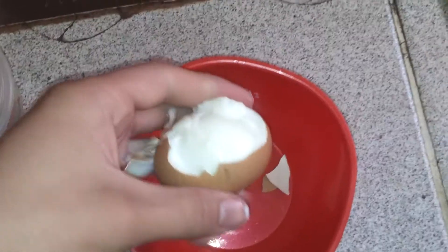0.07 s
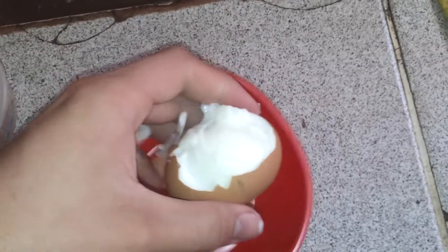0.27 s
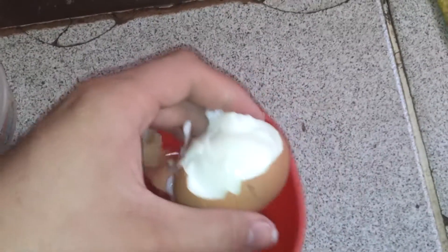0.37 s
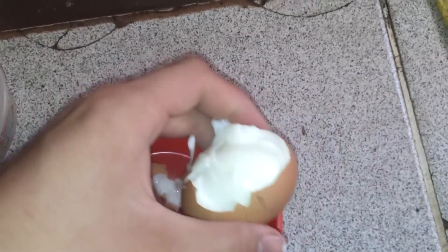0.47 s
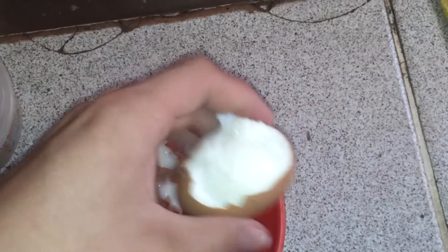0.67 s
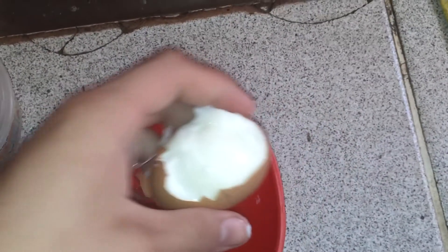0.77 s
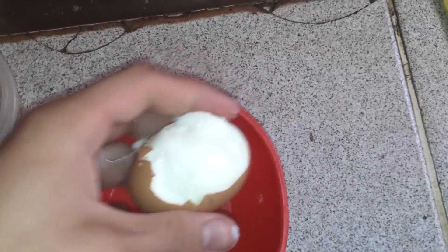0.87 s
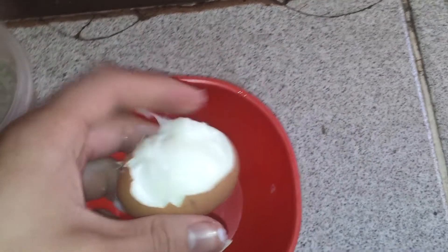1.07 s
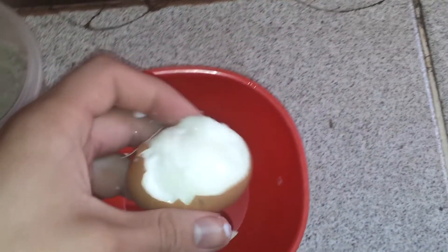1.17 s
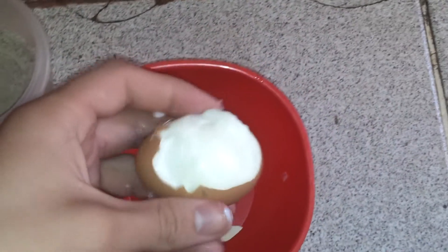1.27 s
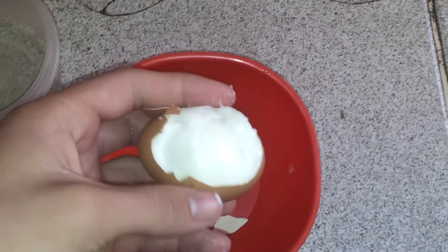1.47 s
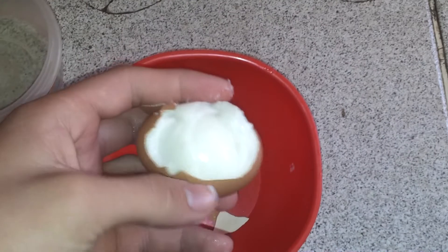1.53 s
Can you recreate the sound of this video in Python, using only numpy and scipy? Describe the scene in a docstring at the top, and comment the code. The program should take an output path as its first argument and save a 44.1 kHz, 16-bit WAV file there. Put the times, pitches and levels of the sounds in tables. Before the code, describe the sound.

A plastic bowl scrapes briefly over a gritty stone floor and knocks twice. Bits of eggshell drop in with sharp clicks, then the shell crackles faintly under fingers. Heard close in a small, reverberant room with a low hum.

```python
"""A plastic bowl scrapes over a gritty stone floor and knocks twice, nudged by a hand that holds a
half-peeled boiled egg. Friction on the grit makes the scrape; each impact sets the bowl's modes ringing.
Bits of eggshell then drop in with sharp clicks, and the shell crackles faintly as it fractures under
the fingers. All is heard from close by, in a small, reverberant, hard-walled room with a low hum."""
import sys
import numpy as np
from scipy import signal
from scipy.fft import rfft, irfft
from scipy.io import wavfile
from scipy.ndimage import uniform_filter1d, minimum_filter1d

SR = 44100
rng = np.random.default_rng(int(sys.argv[2]) if len(sys.argv) > 2 else 0)


def transcribe(u):
    """Save the signal u as a 16-bit wav file named by the first command-line argument.

    u: samples, shape (n,) or (channels, n), limited to [-1, 1]; the rate is SR.
    q: integer samples, one column per channel.
    """
    v = np.clip(np.atleast_2d(u).T, -1, 1)
    q = np.round(v * 32767).astype(np.int16)
    wavfile.write(sys.argv[1], SR, q)


N = 70560

# Spectra of still air and low rumble. Each row: frequency in Hz, relative level in dB.
AIR_SPECTRUM = [(25, -55), (110, -41), (170, -16), (240, -11), (450, -15.5), (950, -19.5), (1900, -25.5),
                (3900, -27), (5600, -30), (7300, -28.5), (15000, -30.5)]
RUMBLE_SPECTRUM = [(25, -13), (55, -7), (90, 5), (170, 0), (260, -8), (600, -47)]
# Tones of the hum. Each row: frequency in Hz, level in dB before the envelope.
HUM_TONES = [(110, -64), (116, -71.5), (238, -76.5), (277, -72)]
# Envelopes of the hum with its rumble, and of the whine. Each row: time in seconds, gain in dB.
HUM_ENVELOPE = [(0, 1), (0.06, -16), (0.4, -21), (0.52, 1.5), (0.749, 4), (0.95, 1.5), (1.2, 3),
                (1.475, 2.5), (1.505, -6)]
WHINE_ENVELOPE = [(1.05, -84), (1.2, -77.5), (1.39, -68.5), (1.6, -70)]
# Bands of the room's tail. Each row: frequency in Hz, 60 dB decay time in seconds, relative level in dB.
REVERB_BANDS = [(110, .3, -12), (300, 0.55, 2.5), (1090, 0.34, 4), (2500, 0.28, 1), (4960, 0.31, -7),
                (12300, 0.33, -5)]
# Balance of the near sounds. Each row: frequency in Hz, left minus right in dB.
BALANCE = [(200, 0), (1000, 0.5), (2500, 0.5), (3600, 3), (4800, 8.5), (6500, 8), (9000, 5.5), (14000, 1.5)]

# Crackles under the fingers. Each row: start in seconds, length in seconds, level in dB.
CRACKLE_BURSTS = [(0.634, 0.0053, -46), (0.675, 0.0054, -59), (0.897, 0.006, -53), (0.98, 0.01, -53),
                  (1.081, 0.0052, -53.5), (1.092, 0.023, -57.5), (1.207, 0.0091, -54),
                  (1.391, 0.0053, -56.5), (1.483, 0.025, -47), (1.512, .005, -42)]
# Impacts of shell flakes, plus one light tap on the bowl at 0.5088 s ringing near 2.4 kHz. Each row: start in
# seconds, level in dB, ring frequency in Hz, relative ring level in dB.
FLAKE_IMPACTS = [(0.4472, -5.5, 6820, -11), (0.4528, 1, 5700, -17), (0.4544, 6.5, 5400, -27),
                 (0.4564, 0.5, 4900, -32), (0.4622, -29, 5640, -25), (0.4990, 1, 6100, -40),
                 (0.5011, -4.5, 6500, -39), (0.5088, -18, 2370, 2), (0.5098, -2.5, 5600, -40)]
# Spectra of a crackle and a click. Each row: frequency in Hz, relative level in dB.
CRACKLE_SPECTRUM = [(300, -3), (1500, -13.5), (3000, -6.5), (4200, -3.5), (6000, -1.5), (7500, 3.5),
                    (9500, -2), (11500, -8), (15000, -15)]
CLICK_SPECTRUM = [(200, -45), (600, -15), (1700, -18.5), (2400, -18), (2850, -21.5), (3500, -6),
                  (4300, -2.5), (6000, 0.5), (8000, -2.5), (10000, -12.5), (15000, -26.5)]

# Envelopes of the bowl's judder and slide. Each row: time in seconds, gain in dB.
JUDDER_ENVELOPE = [(0.021, -72), (0.024, -41), (0.038, -55.5), (0.054, -48), (0.085, -56), (0.12, -83)]
SLIDE_ENVELOPE = [(0.021, -61), (0.025, -36), (0.057, -37), (0.085, -39.5), (0.105, -33.5), (0.138, -37),
                  (0.16, -34.5), (0.2, -52), (0.262, -45.5), (0.287, -29.5), (0.335, -36), (0.365, -29.5),
                  (0.403, -38), (0.42, -41), (0.445, -60)]
# Spectra of the scrape and of a knock's thud and edge. Each row: frequency in Hz, relative level in dB.
SCRAPE_SPECTRUM = [(100, -36.5), (350, -9), (600, -7.5), (820, -3), (1050, -9.5), (1300, -6), (1800, -18.5),
                   (2450, -6.5), (3000, -11), (4000, 0.5), (4700, 4.5), (5700, -4), (7500, 0),
                   (10000, -9.5), (15000, -29)]
THUD_SPECTRUM = [(60, -41.5), (180, -20.5), (330, -4), (600, -5.5), (900, 2), (1300, -0.5), (1900, -7.5),
                 (2900, -14), (6000, -30), (16000, -54)]
EDGE_SPECTRUM = [(500, -40), (2000, -2.5), (2900, -9.5), (3700, -1.5), (4300, -2.5), (4900, 5),
                 (5800, -11.5), (6900, -4), (8400, -6.5), (10500, -20), (15000, -42)]
# Normal modes of the bowl. Each row: frequency in Hz, relative level in dB when struck on the wall,
# the same when struck on the foot, 60 dB decay time in seconds.
BOWL_MODES = [(534, -26, -5, .25), (654, -22, -23, 0.13), (760, -14, -34, 0.13), (913, -15, -29, 0.25),
              (947.5, -10, 0, 0.27), (1059, -7.5, -9, 0.32), (1110, -11, -0.5, .22), (1238, 8.5, 4, 0.28),
              (1433, -22, 0.5, 0.23), (1610, 9, -7, 0.075), (1900, -14, -18, 0.16), (2330, 10, -1, .07),
              (2356, 6, 5, 0.072), (2450, 7.5, -17, 0.069)]
# Impacts of the bowl, clustered into knocks. Each row: start in seconds, level in dB, edge offset in dB,
# ring offset in dB, place struck (0 is the wall, 1 or more the foot).
BOWL_IMPACTS = [(0.0249, -30, 1, 4, 0.58), (0.1661, -2.5, -2.5, 0, 2.5), (0.1688, -6.5, 3, -5.5, 0.11),
                (0.1712, -4, 4, -27, 0), (0.1725, -6.5, -16, 8.5, 0.02), (0.2732, 3.5, -3.5, 0, 0.98),
                (0.2760, -28.5, 19.5, -8, 0.81), (0.282, -17, -11, -22, 0.79),
                (0.3123, -9.5, -7, -3.5, 0.43), (0.3255, -13.5, -10, -10, 0.73)]

TIME = np.arange(N) / SR


def undb(db):
    """Amplitude grows tenfold for every 20 dB."""
    return 10 ** (np.asarray(db) / 20)


def unit_energy(x):
    """Normalisation: the squared samples sum to one."""
    return x / np.sqrt(np.sum(x ** 2, axis=-1, keepdims=True))


def at_frequency(points, f):
    """Interpolation of (Hz, value) points on a logarithmic frequency axis."""
    hz, value = np.array(points).T
    return np.interp(np.log(f + 1), np.log(hz), value)


def envelope(points):
    """Amplitude envelope: straight lines in decibels between (seconds, dB) points."""
    return undb(np.interp(TIME, *np.array(points).T))


def convolve(x, response):
    """Convolution: each sample excites a copy of the impulse response."""
    return signal.fftconvolve(np.atleast_2d(x), np.atleast_2d(response))[:, :N]


def colour(x, spectrum, size=2048):
    """Minimum-phase filtering: a causal response of unit energy imposes the spectrum on x."""
    cepstrum = irfft(np.log(undb(at_frequency(spectrum, np.fft.rfftfreq(size, 1 / SR)))))
    cepstrum[1:size // 2] *= 2
    cepstrum[size // 2 + 1:] = 0
    return convolve(x, unit_energy(irfft(np.exp(rfft(cepstrum)))))


def highpass(x, hz, order):
    """High-pass filtering: the bass falls by 6 dB per octave for each order."""
    return signal.sosfilt(signal.butter(order, hz, "high", fs=SR, output="sos"), x)


def decay(t60):
    """Exponential damping: a fall of 60 dB in t60 seconds."""
    return np.exp(-np.log(1000) * TIME / t60)


def mode(hz, t60, phase=0):
    """Free vibration of one mode: a damped sinusoid."""
    return np.sin(2 * np.pi * hz * TIME + phase) * decay(t60)


def add(out, start, x):
    """Superposition: x joins the mix at start seconds."""
    i = int(start * SR)
    out[..., i:] += x[..., :N - i]


def wander(rate_hz):
    """Slow random modulation with a spread near one."""
    step = int(SR / rate_hz)
    return uniform_filter1d(np.repeat(rng.standard_normal(N // step + 1), step), step)[:N]


def diffuse_noise(corner_hz=1000):
    """A diffuse field: white noise whose two sides are partly coherent in the bass."""
    coherence = 0.52 / (1 + (np.fft.rfftfreq(N, 1 / SR) / corner_hz) ** 2)
    mid, side = rfft(rng.standard_normal((2, N)))
    spectrum = mid * np.sqrt(1 + coherence) + np.array([[1], [-1]]) * side * np.sqrt(1 - coherence)
    return irfft(spectrum, N) / np.sqrt(2)


def contact(rattle_db, t60):
    """Impact excitation: one impulse, then a decaying chatter of tiny ones."""
    return signal.unit_impulse(N) + undb(rattle_db) * unit_energy(diffuse_noise() * decay(t60))


def shot_noise(per_second=12000, spread_db=2.5):
    """Shot noise of unit rms: dense, independent impulses of uneven size."""
    occurs = rng.random(N) < per_second / SR
    size = undb(spread_db * np.minimum(rng.exponential(size=N), 4))
    sign = rng.choice([-1, 1], N)
    return unit_energy(occurs * sign * size) * np.sqrt(N)


def background(waver_db=2, drift=0.0057):
    """Modulated tones make a wavering hum; filtered noise makes rumble, a faint whine and still air."""
    hum = 0
    for hz, db in HUM_TONES:
        amplitude = np.sqrt(2) * undb(db + waver_db * wander(7.1))
        phase = 2 * np.pi * np.cumsum(hz * (1 + drift * wander(6.5))) / SR
        hum += amplitude * np.sin(phase)
    rumble = undb(-68.5) * colour(diffuse_noise(), RUMBLE_SPECTRUM)
    whine = convolve(diffuse_noise(), unit_energy(mode(hz=3935, t60=.025)))
    air = undb(-57) * colour(diffuse_noise(), AIR_SPECTRUM)
    return (hum + rumble) * envelope(HUM_ENVELOPE) + whine * envelope(WHINE_ENVELOPE) + air


def room(x, wet_db, early_onset_s=.002, tail_onset_s=.017):
    """Reverberation: direct sound, early reflections and a tail that lasts longest in the low middle."""
    f = np.fft.rfftfreq(N, 1 / SR)
    centres = [hz for hz, _, _ in REVERB_BANDS]
    noise, tail = rfft(diffuse_noise()), 0
    for weights, (_, t60, db) in zip(np.eye(len(centres)), REVERB_BANDS):
        share = at_frequency(list(zip(centres, weights)), f)  # neighbouring bands crossfade
        shape = unit_energy(decay(t60) * np.minimum(TIME / tail_onset_s, 1))
        tail += undb(db) * irfft(noise * share, N) * shape
    early = unit_energy(diffuse_noise() * decay(t60=.073) * np.minimum(TIME / early_onset_s, 1))
    echoes = highpass(undb(-4.5) * tail + undb(-4) * early, hz=278, order=4)
    return x + undb(wet_db) * signal.fftconvolve(x, echoes, axes=1)[:, :N]


def stereo_image(x, left_lag_s=.00007):
    """Level and time differences: the left side has more treble and arrives slightly later."""
    f = np.fft.rfftfreq(2 * N, 1 / SR)
    tilt = undb(np.array([[1], [-1]]) * at_frequency(BALANCE, f) / 2)
    lag = np.exp(-2j * np.pi * f * np.array([[left_lag_s], [0]]))
    return irfft(rfft(x, 2 * N) * tilt * lag)[:, :N]


def shell_crackles():
    """Brittle fracture: the shell gives way in short runs of tiny cracks as the grip shifts."""
    grip = 0
    for start, length, db in CRACKLE_BURSTS:
        progress = np.clip((TIME - start) / length, 0, 1)
        grip += undb(db) * np.sqrt(np.abs(np.sin(np.pi * progress)))
    return colour(shot_noise() * grip, CRACKLE_SPECTRUM)


def shell_clicks(gain_db=-5.5, ring_cycles=30):
    """Impact of light bodies: falling flakes of shell tick, chatter and ring for an instant; one light tap on
    the bowl rings lower."""
    out = np.zeros((2, N))
    for start, db, hz, ring_db in FLAKE_IMPACTS:
        tick = contact(rattle_db=-4, t60=.025)
        ring = undb(ring_db) * mode(hz, t60=ring_cycles / hz)
        add(out, start, undb(db + gain_db) * (tick + ring))
    return colour(out, CLICK_SPECTRUM)


def bowl_scrape():
    """Stick-slip friction: the bowl's foot judders into motion and catches on grit as it slides."""
    moving = (TIME > SLIDE_ENVELOPE[0][0]) & (TIME < SLIDE_ENVELOPE[-1][0])
    resonance = unit_energy(mode(hz=787, t60=.045))
    judder = convolve(shot_noise() * moving * envelope(JUDDER_ENVELOPE), resonance)
    slide = colour(shot_noise() * moving * envelope(SLIDE_ENVELOPE), SCRAPE_SPECTRUM)
    return judder + slide


def bowl_ring(gain_db=-31, phase_spread_rad=0.98):
    """Modal vibration: the place struck weights each mode, which reaches the two sides out of step."""
    out = np.zeros((2, N))
    modes = [mode(hz, t60, phase_spread_rad * rng.standard_normal((2, 1)))
             for hz, _, _, t60 in BOWL_MODES]
    for start, db, _, ring_db, place in BOWL_IMPACTS:
        weights = [undb(np.interp(place, [0, 1], [wall, foot])) for _, wall, foot, _ in BOWL_MODES]
        ring = sum(weight * vibration for weight, vibration in zip(weights, modes))
        add(out, start, undb(gain_db + db + ring_db) * ring)
    return out


def bowl_knocks():
    """Impact transients: plastic on stone radiates a dull thud with a hard edge."""
    out = np.zeros((2, N))
    for start, db, edge_db, _, _ in BOWL_IMPACTS:
        thud = undb(5.5) * colour(contact(rattle_db=-5.5, t60=.009), THUD_SPECTRUM)
        edge = undb(1 + edge_db) * colour(contact(rattle_db=5.5, t60=.018), EDGE_SPECTRUM)
        add(out, start, undb(db) * (thud + edge))
    return out


def scene():
    """Superposition of bowl and shell, each with its reverberation, over the background."""
    bowl = room(bowl_knocks() + bowl_scrape(), wet_db=0) + room(bowl_ring(), wet_db=-6)
    bowl = highpass(bowl, hz=126, order=1)  # the bowl's sounds carry little deep bass
    shell = room(shell_clicks() + shell_crackles(), wet_db=2.5)
    return stereo_image(bowl + shell) + background()


def record(dry):
    """Peak and band limiting: a fast gain dip holds down the loudest peaks; the top treble is cut."""
    ceiling, window_s, top_hz = .8, .001, 14700
    window = int(window_s * SR)
    allowed_gain = ceiling / np.maximum(np.abs(dry).max(axis=0), ceiling)
    gain = uniform_filter1d(minimum_filter1d(allowed_gain, 2 * window + 1), window)
    return signal.sosfilt(signal.ellip(8, .2, 70, top_hz, fs=SR, output="sos"), dry * gain)


dry = scene()
out = record(dry)
transcribe(out)
```